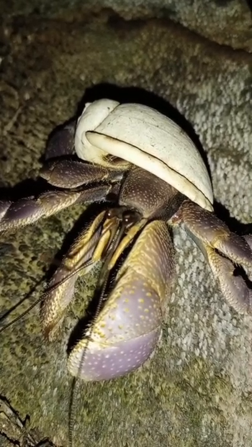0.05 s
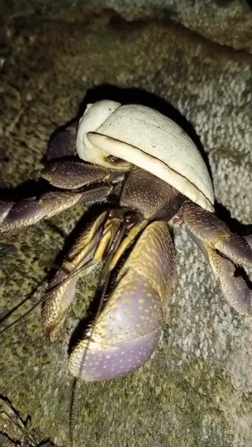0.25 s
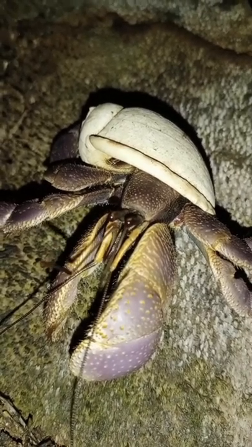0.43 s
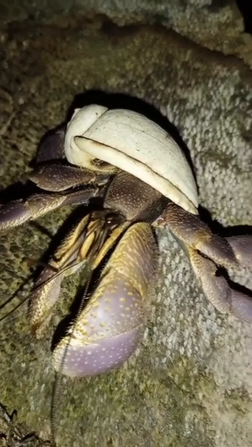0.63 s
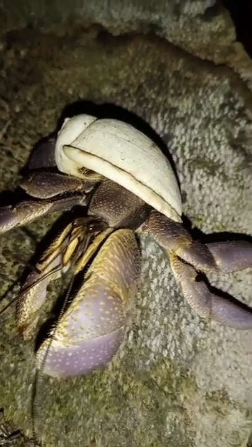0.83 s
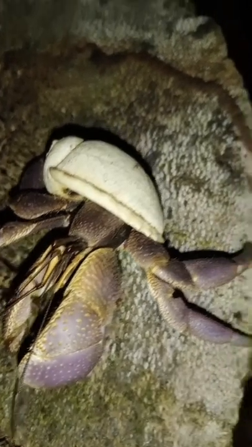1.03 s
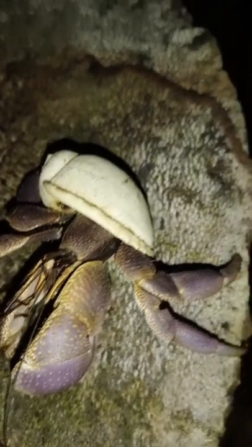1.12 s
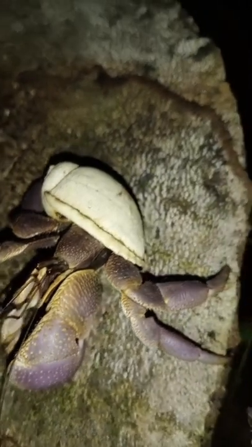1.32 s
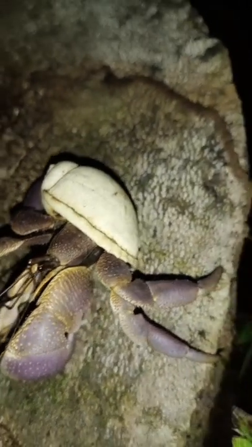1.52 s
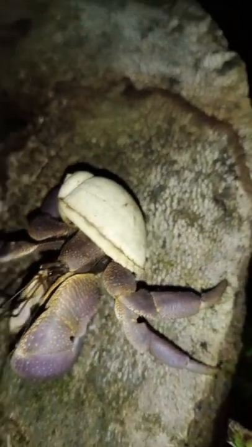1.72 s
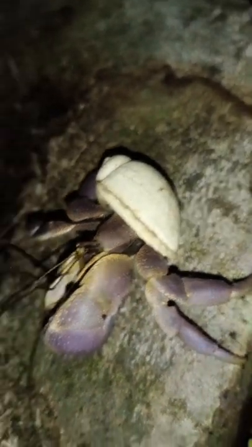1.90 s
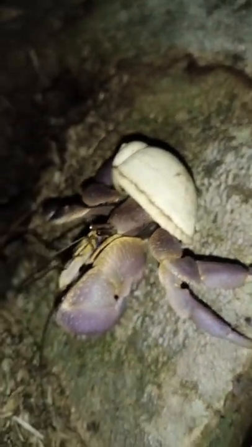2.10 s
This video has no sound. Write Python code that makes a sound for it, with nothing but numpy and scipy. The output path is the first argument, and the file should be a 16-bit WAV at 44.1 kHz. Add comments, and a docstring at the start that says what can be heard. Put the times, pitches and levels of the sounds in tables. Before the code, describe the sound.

A hermit crab clicks and taps lightly on rock over faint night hiss.

```python
"""A hermit crab shifts on a rock at night, heard from close by.
Night hiss, thin high chirps and the throb of a distant engine run throughout.
Near 0.2 s come a few dry snaps and a short gritty scrape; the hand-held microphone
picks up soft bumps and the faint rustle of hand and sleeve.
Light taps of leg tips on the stone follow, fading toward the end."""
import sys
import numpy as np
from scipy import signal
from scipy.fft import rfft, irfft
from scipy.io import wavfile

SR = 44100
rng = np.random.default_rng(int(sys.argv[2]) if len(sys.argv) > 2 else 0)


def store_wav(level_fs):
    """Save 16-bit WAV to argv[1]."""
    pcm = np.round(np.clip(np.atleast_2d(level_fs), -1, 1) * 32767)
    wavfile.write(sys.argv[1], SR, pcm.T.astype(np.int16))


N = 94815
TIME = np.arange(N) / SR


def from_db(db):
    """Decibels to gain."""
    return 10 ** (np.asarray(db) / 20)


def unit_rms(x):
    """Scale to rms 1."""
    return x / np.sqrt(np.mean(x ** 2) + 1e-20)


def envelope(points):
    """Gain over time from (time_s, level_db) points."""
    return from_db(np.interp(TIME, *np.transpose(points)))


def spectrum_gain(points, freq_hz):
    """Gain at freq_hz from (freq_hz, gain_db) points, on a log frequency axis."""
    knots_hz, gain_db = np.transpose(points)
    return from_db(np.interp(np.log(freq_hz + 1), np.log(knots_hz), gain_db))


def coloured(x, points):
    """Filter by a spectrum; rms 1."""
    gain = spectrum_gain(points, np.fft.rfftfreq(len(x), 1 / SR))
    return unit_rms(irfft(rfft(x) * gain, len(x)))


def drift(rate_hz):
    """Random wander: straight lines between unit normal knots."""
    knots = rng.standard_normal(4000)
    return np.interp(TIME * rate_hz, np.arange(len(knots)), knots)


def swell(centre_s, sigma_s):
    """Gaussian envelope; peak 1."""
    return np.exp(-.5 * ((TIME - centre_s) / sigma_s) ** 2)


def decaying_noise(t60_s, size=16384):
    """Exponentially decaying noise; energy 1."""
    x = rng.standard_normal(size) * from_db(-60 * TIME[:size] / t60_s)
    return x / np.linalg.norm(x)


def grains(rate_hz, spread_db=3):
    """Randomly timed clicks of uneven size."""
    clicks = (rng.random(N) < rate_hz / SR) * rng.choice([-1, 1], N)
    return clicks * from_db(spread_db * rng.standard_normal(N))


def patchy(x, depth_db, bands=34):
    """Narrow bands from 1.2 to 9 kHz swell and fade independently; rms 1."""
    spectrum = rfft(x)
    band = np.searchsorted(np.linspace(1200, 9000, bands + 1), np.fft.rfftfreq(N, 1 / SR))
    inner = sum(irfft(spectrum * (band == k), N) * from_db(depth_db * drift(15))
                for k in range(1, bands + 1))
    outer = irfft(spectrum * ((band == 0) | (band > bands)), N)
    return unit_rms(inner + outer)


def minimum_phase_pulse(gain, size):
    """Most compact causal pulse with a given spectrum; peak 1."""
    cepstrum = irfft(np.log(gain + 1e-5))
    cepstrum[1:size // 2] *= 2
    cepstrum[size // 2 + 1:] = 0
    pulse = irfft(np.exp(rfft(cepstrum)))
    return pulse / np.abs(pulse).max()


def add(out, start_s, x):
    """Mix x into out at start_s."""
    i = max(int(round(start_s * SR)), 0)
    out[i:i + len(x)] += x[:N - i]


# hiss spectrum: freq_hz, gain_db
HISS_SPECTRUM = [(25, -11), (50, -7.5), (80, 18), (140, 12), (220, 2.5), (340, -3), (560, -5), (780, -4),
                 (1300, 1.5), (1950, -7.5), (2800, -7.5), (3800, -5.5), (5300, -16.5), (6700, -9),
                 (7350, -39), (7750, 1.5), (8400, -1.5), (9300, -32), (10500, -19.5), (11600, -25.5),
                 (12600, -11.5), (15000, -27), (16000, -3.5)]
# hiss envelope: time_s, level_db
HISS_ENVELOPE = [(0, -55.5), (0.3, -57), (0.5, -58.5), (0.8, -59), (1.2, -61.5), (1.6, -63.5),
                 (2.15, -62.5)]

def night_hiss():
    """Broad noise with a slowly shifting treble."""
    noise = coloured(rng.standard_normal(N), HISS_SPECTRUM)
    return envelope(HISS_ENVELOPE) * patchy(noise, depth_db=4)


# harmonics of the turning rate: order, gain_db
ENGINE_HARMONICS = [(3, -5.5), (4, 2.5), (5, 0), (6, -12.5), (7, -40.5)]
# engine envelope: time_s, level_db
ENGINE_ENVELOPE = [(0, -55.5), (0.16, -57.5), (0.27, -60), (0.5, -64.5), (0.65, -59.5), (0.85, -67),
                   (1.1, -66), (1.4, -73), (1.7, -69), (2.15, -75)]

def engine(turn_hz=23.35, waver_hz=.05, in_phase_s=.025, wander_db=2.3):
    """Distant engine: neighbouring low orders beat into a throb."""
    turns = np.cumsum(turn_hz + waver_hz * drift(18)) / SR - turn_hz * in_phase_s
    throb = sum(from_db(gain_db + wander_db * drift(10)) * np.sin(2 * np.pi * order * turns)
                for order, gain_db in ENGINE_HARMONICS)
    return envelope(ENGINE_ENVELOPE) * throb


# calls: centre_s, peak_db, pitch_hz, glide_hz_per_s
CHIRP_CALLS = [(0.004, -49.5, 8360, -5000), (0.149, -55.5, 6600, -1000), (0.212, -61, 8230, 3992),
               (0.300, -53.5, 8250, -8000), (0.295, -50, 6440, 15), (0.494, -57, 8200, 991.5),
               (0.779, -56.5, 8270, 2001), (1.07, -60.5, 8260, -2000), (1.437, -57, 8180, -4),
               (1.478, -53.5, 6670, -2000), (1.634, -57.5, 6740, 1973), (1.676, -57.5, 7940, -2000),
               (1.943, -59, 7770, -3000)]

def chirps(sigma_s=.01, waver_hz=123):
    """Thin wavering calls of small night animals."""
    out = np.zeros(N)
    for centre_s, peak_db, pitch_hz, glide_hz_per_s in CHIRP_CALLS:
        freq_hz = pitch_hz + glide_hz_per_s * (TIME - centre_s) + waver_hz * drift(600)
        tone = np.sin(2 * np.pi * np.cumsum(freq_hz) / SR)
        out += from_db(peak_db) * swell(centre_s, sigma_s) * tone
    return out


# rustle spectrum: freq_hz, gain_db
RUSTLE_SPECTRUM = [(200, -3.5), (450, -5), (700, -7.5), (1400, -25.5), (2000, -13.5), (2750, -3.5),
                   (3350, -5), (3900, 1), (4400, 3.5), (5000, -3.5), (5600, 0), (6200, -8.5), (6700, 1.5),
                   (7500, 0), (9400, -17.5), (16000, -34.5)]
# rustle envelope: time_s, level_db
RUSTLE_ENVELOPE = [(0, -84), (0.12, -72), (0.2, -51.5), (0.33, -70), (0.5, -76.5), (0.68, -64),
                   (0.82, -66.5), (0.9, -58), (1.02, -65), (1.15, -62.5), (1.25, -62.5), (1.45, -64),
                   (1.56, -62.5), (1.68, -65.5), (1.8, -65.5), (2.0, -65.5), (2.15, -72.5)]

def rustle(flicker_db=.2):
    """Soft, grainy rubbing of the moving hand and sleeve."""
    rubbing = patchy(coloured(grains(rate_hz=6000), RUSTLE_SPECTRUM), depth_db=5)
    return envelope(RUSTLE_ENVELOPE) * rubbing * from_db(flicker_db * drift(140))


# sizzle spectrum: freq_hz, gain_db
SIZZLE_SPECTRUM = [(7000, -19.5), (9500, -24.5), (10800, -9.5), (11600, -11.5), (12500, 0), (14300, -2),
                   (15500, -10.5), (16200, -18.5)]
# sizzle envelope: time_s, level_db
SIZZLE_ENVELOPE = [(0, -70), (0.06, -66.5), (0.13, -75.5), (0.3, -65.5), (0.46, -76), (0.7, -68.5),
                   (0.83, -61.5), (0.92, -63.5), (0.96, -63.5), (1.02, -60), (1.1, -64.5), (1.26, -65.5),
                   (1.305, -72), (1.35, -63), (1.43, -65), (1.52, -66.5), (1.72, -69), (2.15, -67)]

def sizzle(flicker_db=2):
    """The finest, highest part of the rustle."""
    gain = envelope(SIZZLE_ENVELOPE) * from_db(flicker_db * drift(120))
    return gain * coloured(rng.standard_normal(N), SIZZLE_SPECTRUM)


# faint rubs: centre_s, level_db, sigma_s, pitch_hz, glide_hz_per_s
RUB_STROKES = [(0.029, -62, 0.039, 5270, 0), (0.89, -62, 0.077, 5900, -2200),
               (0.94, -63.5, 0.097, 3056, -900), (0.991, -64, 0.044, 3885, -3),
               (1.019, -62.5, 0.052, 5150, -2500), (1.098, -71.5, .10, 4390, -1300),
               (1.04, -64.5, 0.043, 374, -2500), (1.14, -72.5, 0.085, 308.2, -300),
               (1.229, -62.5, 0.015, 2770, 3.5), (1.269, -69, .04, 830, -1000),
               (1.312, -63, 0.15, 3893, -1400), (1.33, -70.5, 0.17, 6800, -500), (1.36, -62, 0.03, 391, 0),
               (1.422, -68, 0.13, 2785, -1200), (1.475, -61.5, 0.036, 4260, -6000),
               (1.608, -65.5, 0.065, 5560, -2800), (1.69, -61.5, 0.016, 2870, 1996),
               (1.70, -66, .08, 4004, -1300), (1.85, -72, 0.11, 3190, -2.5),
               (1.98, -74.5, 0.093, 4500, -1000)]

def rubs(bandwidth_hz=290, rough_db=3.7):
    """Friction noise in narrow resonances, most sliding down in pitch."""
    out = np.zeros(N)
    lowpass = signal.butter(2, bandwidth_hz / 2, fs=SR, output="sos")
    for centre_s, level_db, sigma_s, pitch_hz, glide_hz_per_s in RUB_STROKES:
        phase = 2 * np.pi * np.cumsum(pitch_hz + glide_hz_per_s * (TIME - centre_s)) / SR
        in_phase, quadrature = signal.sosfilt(lowpass, rng.standard_normal((2, N)))
        band = in_phase * np.cos(phase) + quadrature * np.sin(phase)
        friction = unit_rms(band * from_db(rough_db * drift(90)))
        out += from_db(level_db) * swell(centre_s, sigma_s) * friction
    return out


# thuds: centre_s, level_db, pitch_hz, sigma_s
HANDLING_BUMPS = [(0.242, -46.5, 330, 0.0033), (0.315, -54.5, 424, .003), (0.7083, -35.5, 373.5, 0.0019),
                  (0.714, -47, 150, 0.0046), (0.737, -61, 340, 0.019), (0.974, -61.5, 510, 0.0074),
                  (1.021, -62, 414, 0.0038), (1.043, -47, 126, 0.012), (1.331, -58, 169, 0.0049),
                  (1.3332, -51, 408, 0.0022), (1.476, -59, 85.8, 0.024)]

def bumps(roughness=.25):
    """Microphone handling: dull thuds of a few uneven cycles."""
    out = np.zeros(N)
    for centre_s, level_db, pitch_hz, sigma_s in HANDLING_BUMPS:
        tone = np.cos(2 * np.pi * pitch_hz * (TIME - centre_s))
        lowpass = signal.butter(2, pitch_hz, fs=SR, output="sos")
        noise = signal.sosfilt(lowpass, drift(2 * pitch_hz))
        out += from_db(level_db) * swell(centre_s, sigma_s) * (tone + roughness * noise)
    return out


# slips: centre_s, level_db, sigma_s
SCRAPE_SLIPS = [(0.2332, -43, 0.0066), (0.245, -39, .003), (0.259, -48.5, .005), (0.2736, -42, 0.0044),
                (0.287, -53, .013), (0.887, -59, 0.0088), (0.964, -63.5, .004), (1.363, -62.5, 0.019)]
# grit spectrum: freq_hz, gain_db
GRIT_SPECTRUM = [(100, -9), (320, 5), (600, -12.5), (950, 0.5), (1700, -1), (2800, -7), (4200, -11),
                 (6300, -0.5), (7800, -26), (9500, -28), (12000, -21), (13500, -9), (15300, -10),
                 (16000, -26.5)]

def scrapes():
    """Dense grains of grit under short slips."""
    grit = coloured(grains(rate_hz=10000), GRIT_SPECTRUM)
    return grit * sum(from_db(level_db) * swell(centre_s, sigma_s)
                      for centre_s, level_db, sigma_s in SCRAPE_SLIPS)


# tap modes at pitch ratio 1: freq_hz, gain_db, t60_s
RING_MODES = [(875, -13.5, 0.063), (1592, -2, 0.013), (1644, -7.5, 0.04), (2350, -20, 0.021),
              (2670, -0.5, 0.022), (3087, -2.5, 0.048), (4600, -24, 0.015), (5750, -6, .014)]

def tap_ring(pitch_ratio, size=8192):
    """Decaying modes, struck a little differently each time."""
    out, t = np.zeros(size), TIME[:size]
    for freq_hz, gain_db, t60_s in RING_MODES:
        strike = rng.choice([-1, 1]) * from_db(gain_db + rng.normal())
        out += strike * from_db(-60 * t / t60_s) * np.sin(2 * np.pi * freq_hz * pitch_ratio * t)
    return out


# leg contacts: start_s, ring_db, pitch_ratio, tick_peak_db
LEG_TAPS = [(0.2272, -33, 1.32, -60), (0.5466, -61.5, 1.32, -35), (0.8692, -37, 0.97, -27),
            (0.894, -53.5, 1.64, -44), (0.9645, -51.5, 1.9, -43), (1.2164, -52, .9, -50),
            (1.3521, -48.5, 0.88, -45), (1.441, -58, 1.45, -50), (1.638, -67, 0.79, -59),
            (1.912, -59, 1.03, -57)]

def taps(tick_band_hz=(13000, 15400)):
    """Leg tips touch the stone: a bright tick and a short ring."""
    out = np.zeros(N)
    bandpass = signal.butter(2, tick_band_hz, "band", fs=SR, output="sos")
    for start_s, ring_db, pitch_ratio, tick_peak_db in LEG_TAPS:
        tick = signal.sosfilt(bandpass, decaying_noise(t60_s=.0019, size=4096))
        add(out, start_s, from_db(ring_db) * tap_ring(pitch_ratio))
        add(out, start_s, from_db(tick_peak_db) * tick / np.abs(tick).max())
    return out


# cracks: start_s, peak_db, low_edge_hz, high_edge_hz
SNAP_CRACKS = [(0.1813, -16, 2130, 7400), (0.2279, -15, 1960, 3630), (0.2395, 1.5, 610, 15200),
               (0.2545, -29.5, 3420, 9000), (0.2935, -35, 3010, 8000), (1.2165, -42.5, 2500, 5470),
               (1.3535, -38.5, 2410, 6600), (1.4400, -47, 3200, 8000)]
# crack spectrum: freq_hz, gain_db
CRACK_SPECTRUM = [(100, -16.5), (330, -6), (720, -24), (860, -2.5), (1250, -4), (1620, -10), (2000, -9),
                  (2450, -2.5), (3100, -6.5), (4000, -3.5), (4700, 1), (6900, 0.5), (7750, -16),
                  (8700, -17), (9400, -27), (10700, -19.5), (11500, -25), (13000, -15.5), (15500, -22.5)]

def snaps(echo_s=.0032, echo_db=-21, rattle_db=-12.5, size=2048):
    """Sub-millisecond cracks, each with an echo off the rock and a brief rattle."""
    out = np.zeros(N)
    freq_hz = np.fft.rfftfreq(size, 1 / SR) + 1
    for start_s, peak_db, low_edge_hz, high_edge_hz in SNAP_CRACKS:
        highpass = 1 / np.sqrt(1 + (low_edge_hz / freq_hz) ** 6)
        lowpass = 1 / np.sqrt(1 + (freq_hz / high_edge_hz) ** 8)
        gain = spectrum_gain(CRACK_SPECTRUM, freq_hz) * highpass * lowpass
        crack = from_db(peak_db) * minimum_phase_pulse(gain, size)
        rattle = signal.fftconvolve(crack, decaying_noise(t60_s=.01))
        add(out, start_s, crack)
        add(out, start_s + echo_s, from_db(echo_db) * crack)
        add(out, start_s, from_db(rattle_db) * rattle)
    return out


def scene(tail_db=-33.5):
    """Mono mix: close contacts with a faint outdoor tail, over the night background."""
    contacts = snaps() + taps()
    tail = from_db(tail_db) * signal.fftconvolve(contacts, decaying_noise(t60_s=.9))[:N]
    hiss = night_hiss()
    close = contacts + tail + scrapes() + bumps() + rubs() + rustle() + sizzle()
    return (close + chirps() + engine() + hiss)[None]


def record(dry, cutoff_hz=15850):
    """Steep elliptic low-pass."""
    return signal.sosfilt(signal.ellip(10, .1, 70, cutoff_hz, fs=SR, output="sos"), dry)


dry = scene()
out = record(dry)
store_wav(out)
```